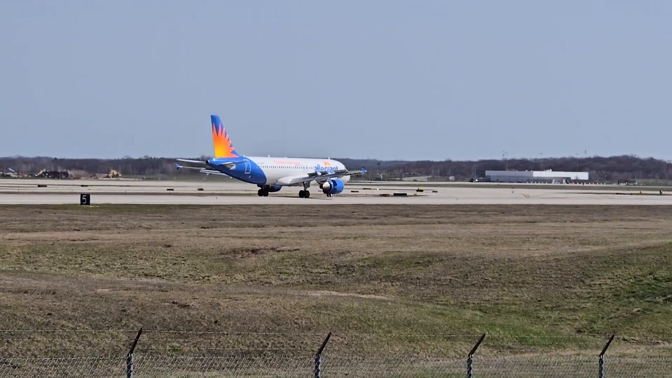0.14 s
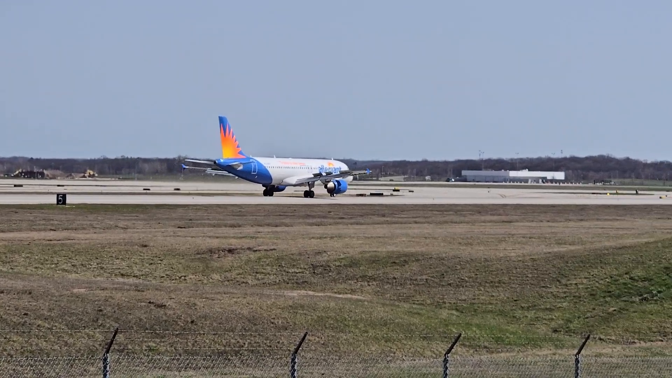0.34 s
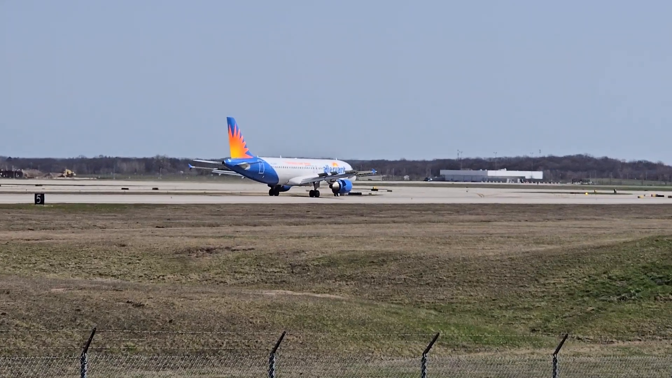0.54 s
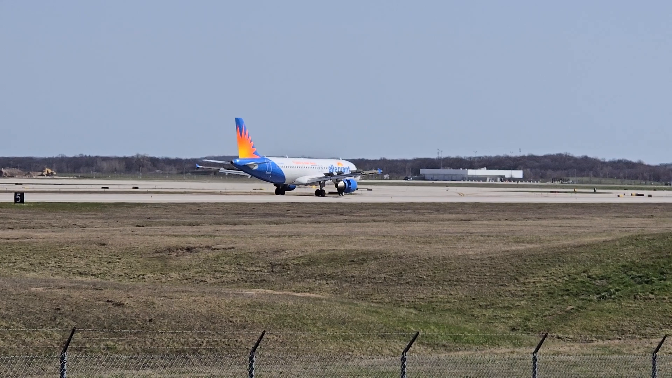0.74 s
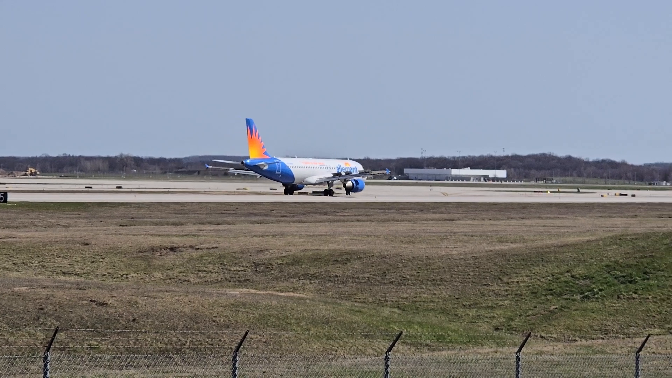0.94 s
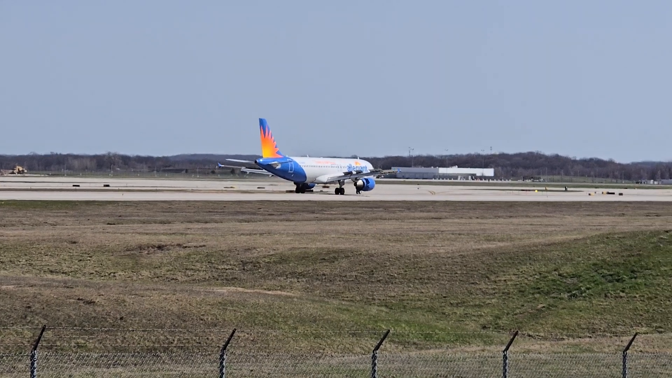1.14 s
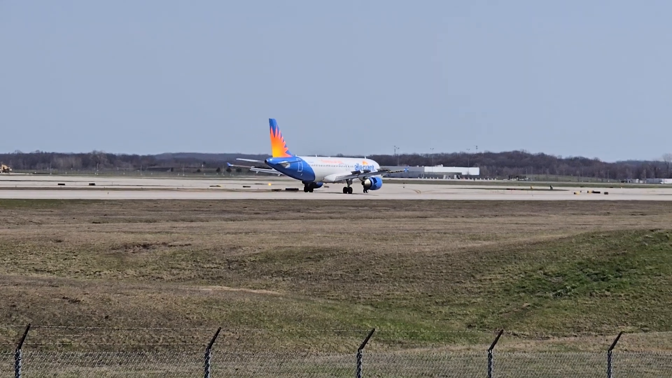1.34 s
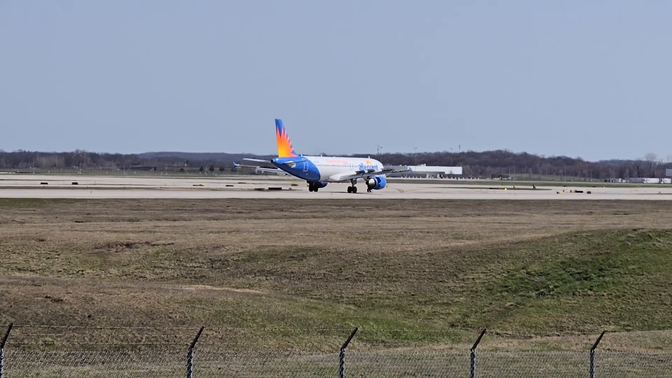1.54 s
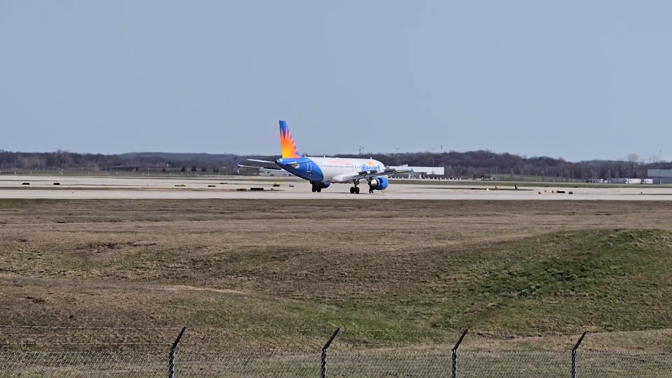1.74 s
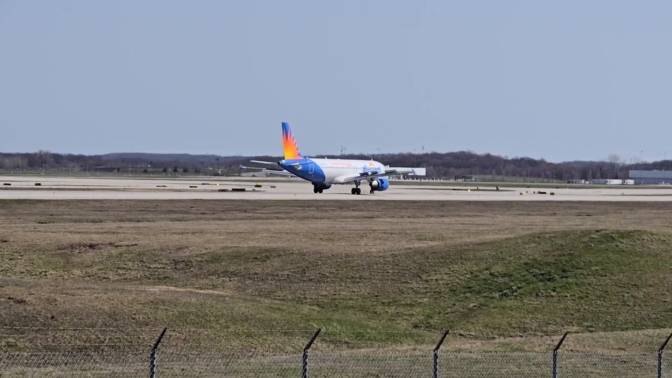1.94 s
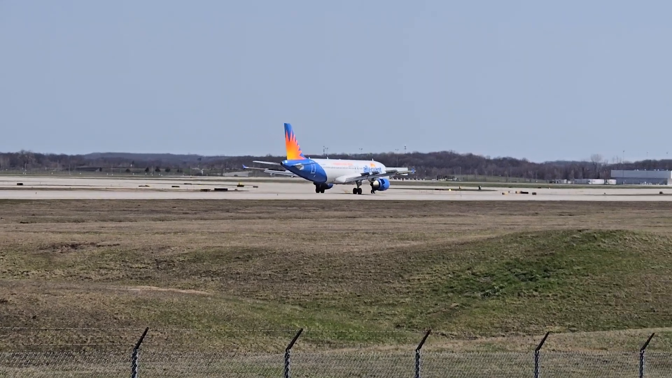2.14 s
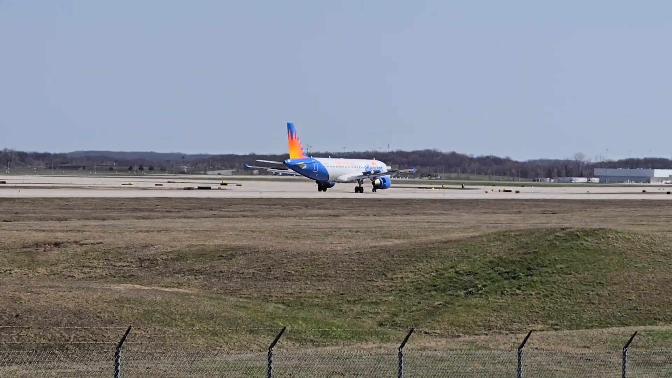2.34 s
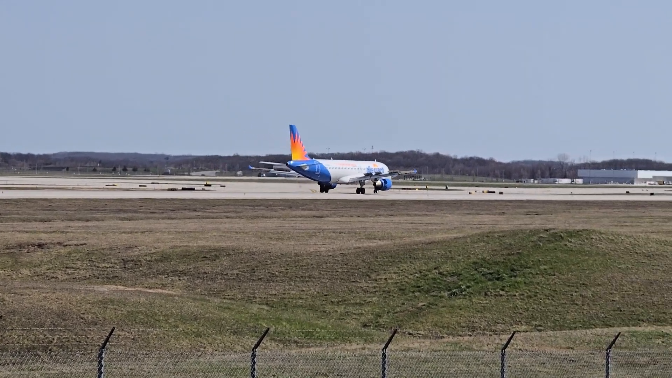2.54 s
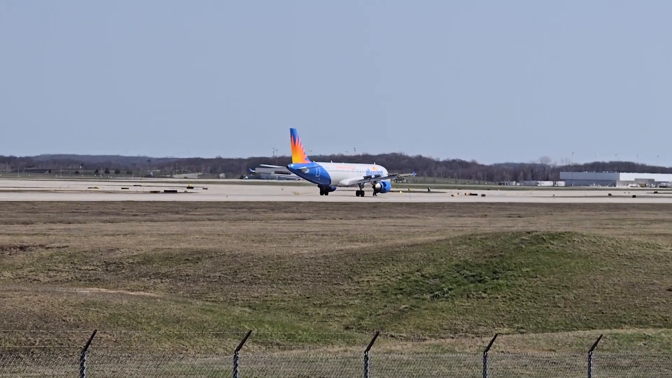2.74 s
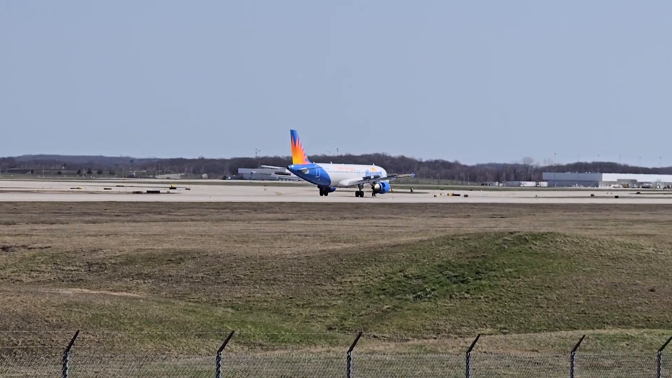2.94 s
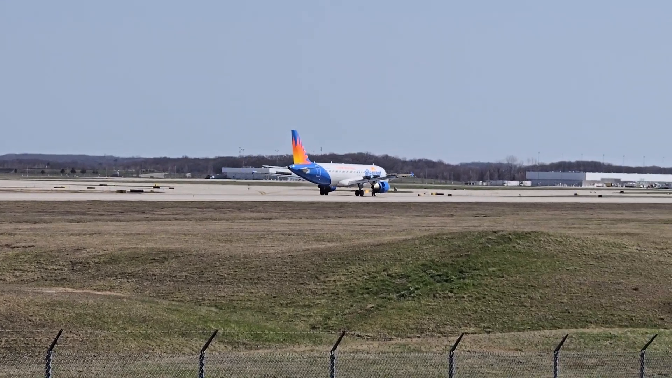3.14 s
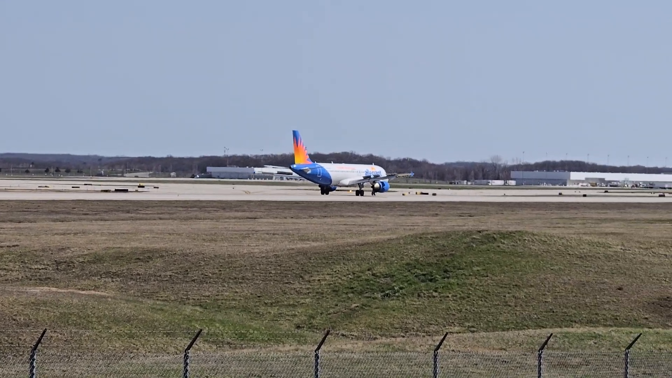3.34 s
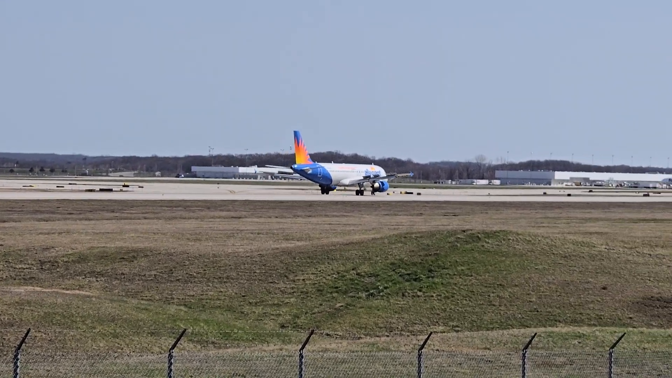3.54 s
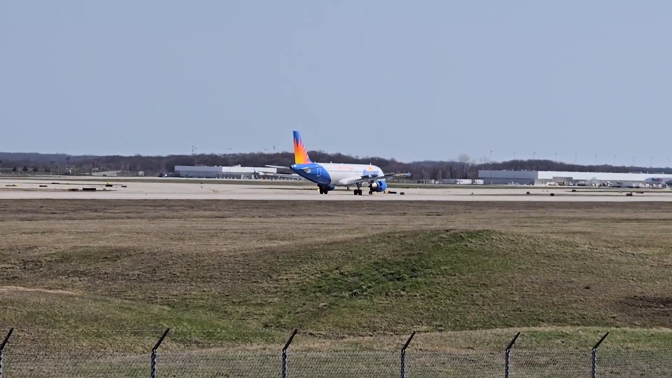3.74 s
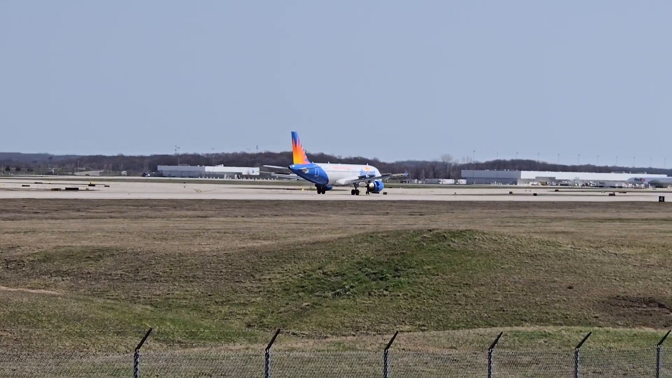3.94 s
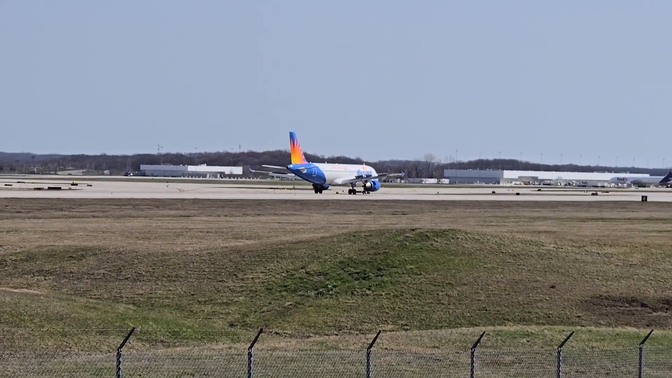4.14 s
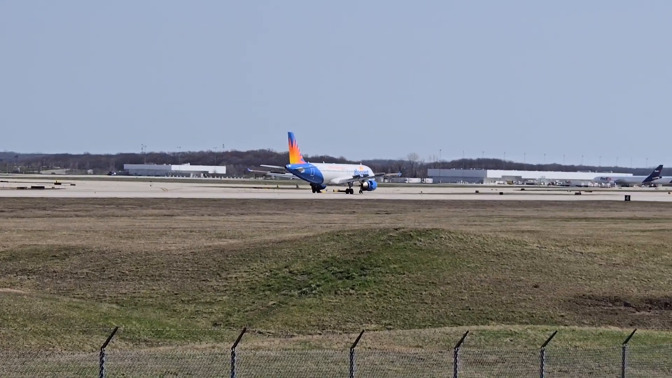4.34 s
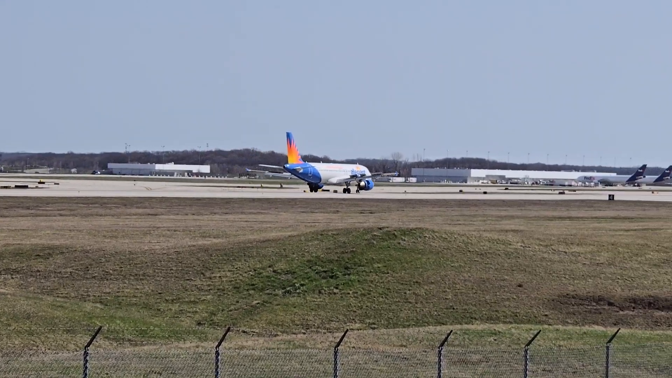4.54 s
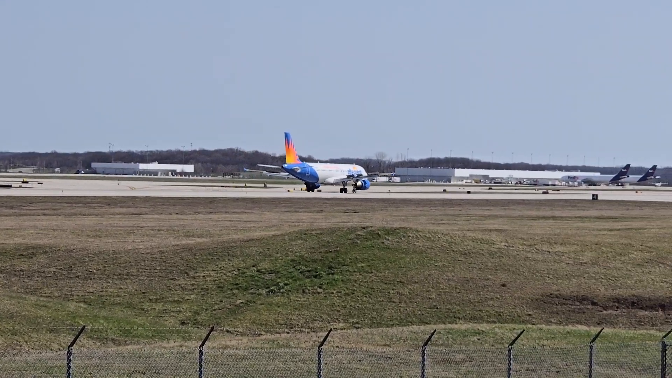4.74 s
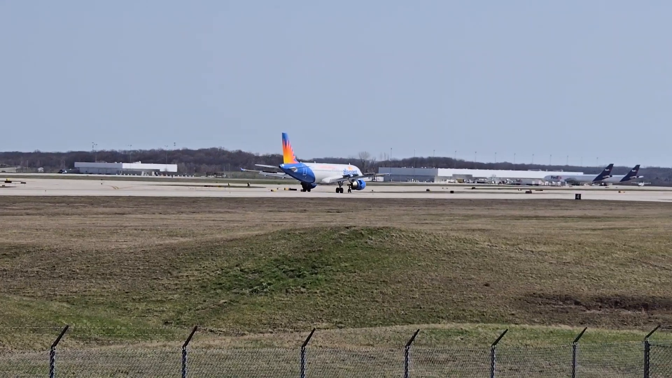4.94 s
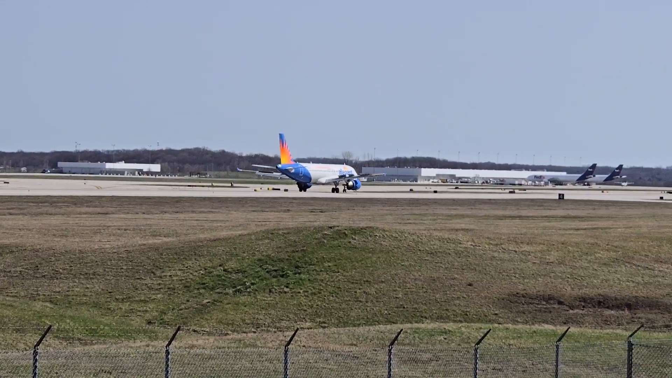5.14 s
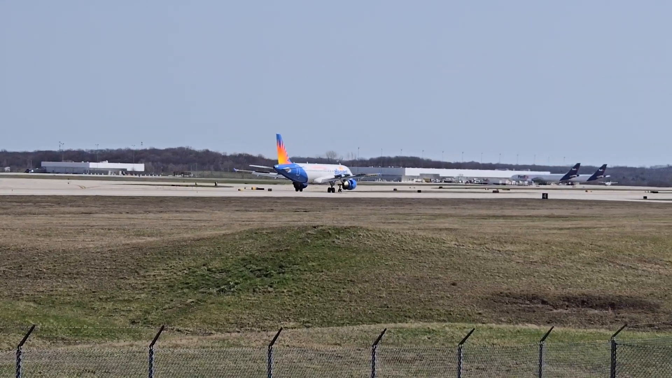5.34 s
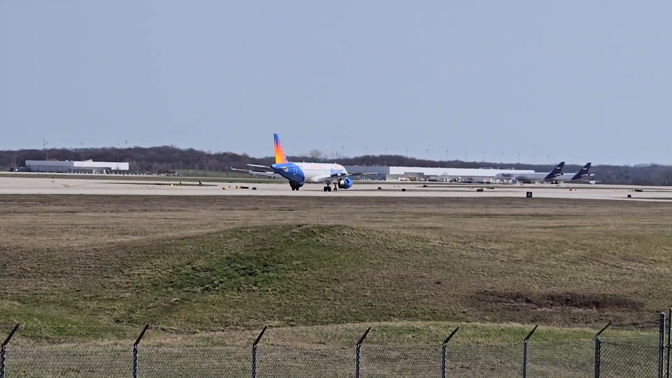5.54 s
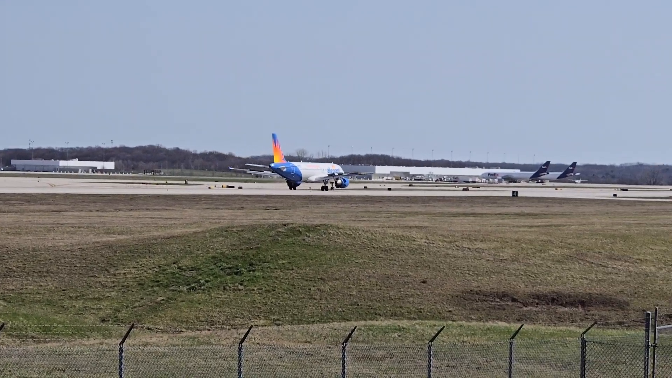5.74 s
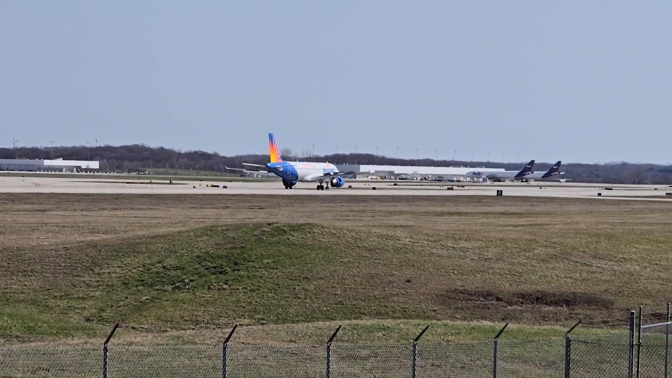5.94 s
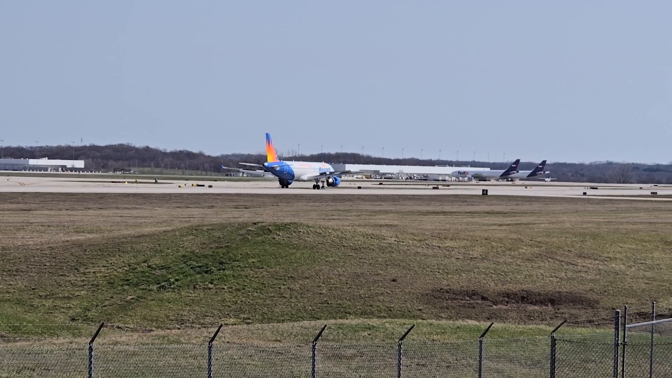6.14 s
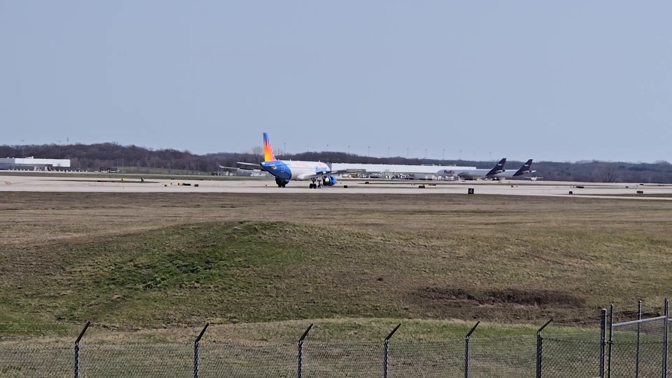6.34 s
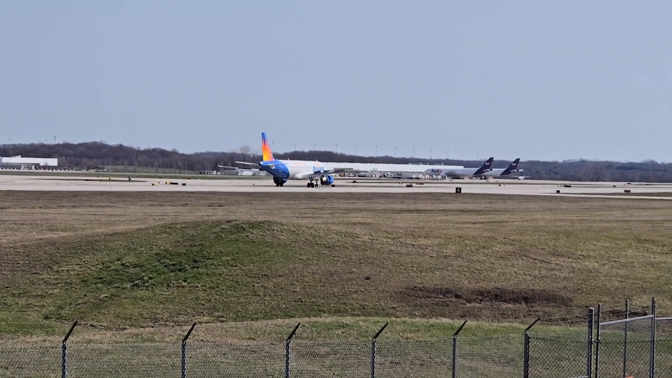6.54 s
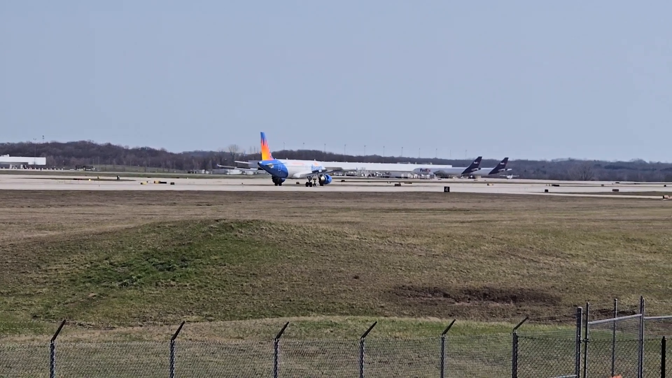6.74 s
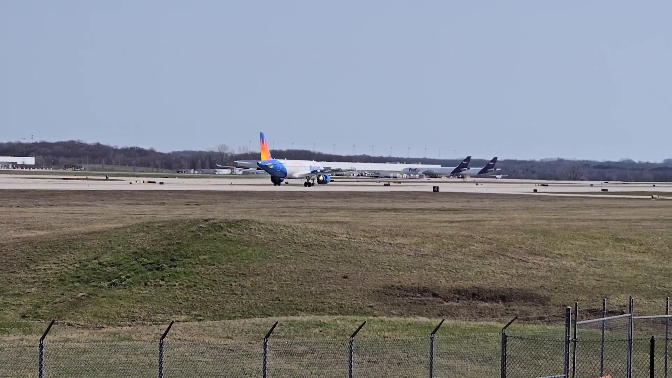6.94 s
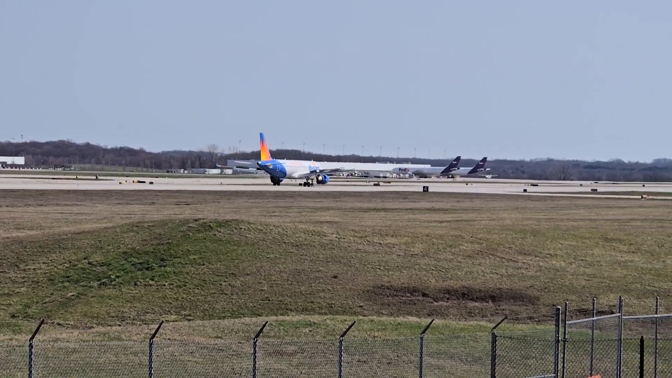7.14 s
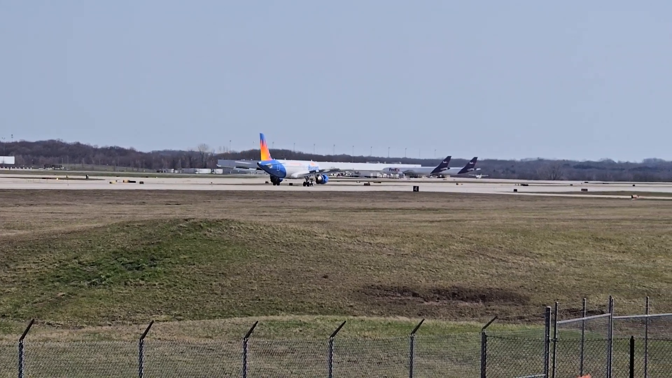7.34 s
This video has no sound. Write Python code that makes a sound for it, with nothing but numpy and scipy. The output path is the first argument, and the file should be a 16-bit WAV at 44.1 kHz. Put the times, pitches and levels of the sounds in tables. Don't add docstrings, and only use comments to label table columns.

```python
import sys
import numpy as np
from scipy import signal
from scipy.io import wavfile
from scipy.ndimage import uniform_filter1d

SR = 44100
rng = np.random.default_rng(int(sys.argv[2]) if len(sys.argv) > 2 else 0)


def unload_wav(signal):
    wavfile.write(
        sys.argv[1],
        SR,
        np.round(np.clip(np.atleast_2d(signal).T, -1, 1) * 32767).astype(np.int16),
    )


def attenuation_scalar(level_db):
    decades = np.asarray(level_db, float) / 20
    return 10 ** decades


N = 325899

FRAME, HOP = 2048, 512
HZ = np.fft.rfftfreq(FRAME, 1 / SR)
TIMES = np.arange(N // HOP + 5) * HOP / SR
AIR_LOSS_FROM_HZ, AIR_LOSS_DB = 5340, 2.6

# time in seconds, roar level in dB.
THRUST = [(0, -13.5), (.2, -15.5), (.45, -18), (.72, -17), (.9, -20), (1.25, -22.5), (1.5, -20.5),
          (1.75, -21.5), (2.2, -24.5), (2.5, -27), (3.5, -28), (4.0, -31), (4.7, -33.5), (5.3, -33),
          (5.85, -32), (6.3, -36), (6.9, -38), (7.39, -36)]
JET_BANDS = [(30, 130), (130, 450), (450, 2450), (2650, 5200)]
# level at full thrust in dB, dB per dB of thrust, share of the
JET_FOLLOW = [(-15.5, 1.06, 1.09), (-19.5, 0.9951, 0.37), (-15.5, 1.0456, 0), (-30.5, 1.062, 0)]
# frequency in Hz, density in dB per Hz.
JET_COLOUR = [(15, -38), (28, -22), (45, -4), (68, 0), (120, -4), (200, -11), (273, -16), (339, -12),
              (421, -22), (500, -17), (700, -19), (1000, -19), (1430, -15), (1900, -21)]
# time in seconds, length in seconds, rise in dB.
BOOMS = [(.07, 0.082, 7.5), (.37, 0.33, 9.5), (.65, 0.1, 10), (.85, 0.092, 3), (1.0, .1, 0.5),
         (1.55, 0.21, 1), (1.97, 0.11, -1), (2.16, 0.071, 1.5), (2.4, .2, 0.5), (2.8, 0.052, 3.5),
         (3.0, 0.21, 3.5), (3.35, 0.12, 5.5), (3.7, 0.2, 6), (3.83, 0.033, 11), (5.06, 0.17, 9),
         (6.22, .06, 9), (6.52, 0.25, 14.5), (7.02, 0.12, 9), (7.35, 0.45, 11.5)]
# time in seconds, length in seconds, change in dB.
LULLS = [(0.74, 0.04, -3), (1.135, 0.13, -0.5), (1.787, 0.18, -2), (2.06, .06, -2), (2.62, 0.12, -2),
         (3.55, 0.082, -4), (3.928, 0.093, -5.5), (4.717, 0.1, -7), (5.91, 0.069, 0.5)]
# frequency in Hz, likeness (0-1), left's lead in radians,
# left-right difference in dB.
PORTS = [(40, .84, -.35, 0), (170, .74, -.1, -.5), (320, .83, 0, 0), (500, .94, .2, 1), (750, .97, .2, 1),
         (1500, .92, .5, 1), (2400, .86, .6, .5), (2600, .2, 1.2, -2), (2800, .6, 2.9, 2),
         (3050, .4, 1.7, 4), (3600, .5, 2, 3.5), (4200, .6, 1.6, 0), (5000, .6, 2.8, -2.5),
         (6000, .32, 2.9, 9)]
# frequency in Hz, gain in dB.
HOUSING = [(1900, -0.5), (2250, -1), (2720, -17.5), (2950, -11.5), (3200, -15.5), (3800, -14.5),
           (4400, -15), (4900, -14), (5300, -28), (6200, -38.5), (7600, -45.5), (8500, -66.5), (9200, -100)]
# frequency in Hz, density in dB per Hz.
FIELD = [(15, -34), (40, -14.5), (170, -0.5), (300, -9), (450, -1.5), (750, 0), (1000, -11), (1400, -16),
         (1900, -22.5)]
# frequency in Hz, density in dB per Hz.
SELF_NOISE = [(4000, -20), (6500, -11), (7500, -3), (8900, -9), (10000, -5), (10900, -11), (11800, 0),
              (12500, -3), (13300, -3), (14500, -6), (15500, -10), (16200, -25)]
# time in seconds, level in dB.
SELF_NOISE_DB = [(0, -93), (2.5, -86), (3.6, -82), (7.39, -77.5)]
# time in seconds, level in dB.
WIND = [(0, -55), (2.6, -49.5), (3.2, -41.5), (4.0, -34), (4.5, -33), (5.4, -35), (6.2, -26.5), (6.7, -31),
        (7.0, -29.5), (7.39, -28.5)]
# frequency in Hz, density in dB per Hz.
WIND_COLOUR = [(18, -12), (35, -2.5), (85, -9.5), (170, 3), (300, -8), (520, -16.5), (1500, -61),
               (4000, -110)]
FOLDS = [(3.57, .04), (3.76, .06), (4.03, .06), (5.88, .04), (6.57, .05), (7.185, .09)]
# start in seconds, length in seconds, from
# Hz, to Hz, level in dB.
CHIPS = [
    (3.56, 0.045, 8570, 8140, -84),
    (3.775, 0.046, 8250, 7650, -79),
    (4.12, .035, 8280, 7870, -79),
    (4.738, 0.042, 8900, 7600, -77.5),
    (5.268, .047, 8270, 7750, -75),
    (6.22, .1, 10600, 8900, -86),
    (6.44, .06, 12200, 11100, -81),
    (6.49, .04, 15200, 14100, -85),
]
# time in seconds, length in seconds, centre in Hz, width in Hz,
# level in dB.
RUSTLES = [(3.8, .2, 10200, 900, -92), (5.83, .08, 7300, 2500, -84), (6.203, .25, 10100, 1200, -83),
           (6.303, .04, 11000, 8000, -86), (6.5, .06, 12500, 6000, -85), (7.28, .15, 8500, 6000, -82)]
# time in seconds, length in seconds, rise in dB.
FAN_SWELLS = [(4.52, .08, 16), (4.87, .07, 12), (5.25, 0.1, 7), (5.56, 0.074, 9), (5.96, 0.15, 9.5),
              (6.62, 0.051, 7.5), (6.82, .12, 5), (7.02, .06, -2)]
# start in seconds, length in seconds, from Hz, to Hz, level in dB.
DROPS = [
    (5.274, 0.057, 5260, 4920, -61),
    (5.88, .04, 5340, 5200, -69.5),
    (5.967, 0.034, 5100, 4820, -55),
    (6.036, 0.079, 4540, 4330, -56.5),
    (6.24, 0.048, 3570, 3585, -60),
    (6.275, .075, 4900, 4260, -67),
    (6.47, .04, 4900, 4480, -59),
]
# start in seconds, length in seconds, from Hz, to Hz,
# level in dB.
HOOKS = [
    (5.442, .145, 4190, 4065, -61.5),
    (5.66, 0.1, 4760, 3800, -60),
    (6.118, 0.11, 4000, 3490, -57),
    (6.333, .135, 3350, 3250, -57.5),
    (6.467, .15, 4000, 3330, -53),
    (6.68, 0.11, 3780, 3345, -68),
]
# pitch in Hz, left's lead in radians,
# left-right difference in dB.
LARK_SIDE = [(3300, 2.5, 3), (3700, 2., 2.5), (4100, 1., 1), (4600, 1., 0), (5200, .7, -1)]
# time in seconds, level in dB.
TICKS = [
    (6.293, -63),
    (7.226, -54),
    (7.277, -50),
]


def evened(x):
    return x / np.sqrt(np.mean(x ** 2) + 1e-20)


def read(points, column=1):
    table = np.array(points, float)
    return np.interp(np.log(HZ + 1), np.log(table[:, 0] + 1), table[:, column])


def whole(colour_db):
    return colour_db - 10 * np.log10(np.sum(attenuation_scalar(colour_db) ** 2))


def bumps(events, t):
    return sum(db * np.exp(-(2 * (t - s) / length) ** 2) for s, length, db in events)


def patches(bins, frames):
    field = rng.standard_normal((len(TIMES), len(HZ))).T
    return evened(uniform_filter1d(uniform_filter1d(field, bins, 0), frames, 1))


def noise(power_db, same=0., lead=0., balance_db=0.):
    a, b, c, d = rng.standard_normal((len(TIMES), len(HZ), 4)).T
    same, lead, balance_db = (np.reshape(v, (-1, 1)) for v in (np.clip(same, 0, 1), lead, balance_db))
    left = a + 1j * b
    right = same * left * np.exp(-1j * lead) + np.sqrt(1 - same ** 2) * (c + 1j * d)
    z = np.array([left * attenuation_scalar(balance_db / 2), right / attenuation_scalar(balance_db / 2)]) * attenuation_scalar(power_db)
    unit = np.sqrt(3 / 8)
    return unit * signal.istft(z, nperseg=FRAME, noverlap=FRAME - HOP)[1][:, :N]


def tone(rows, lead, balance_db, overtones_db=(), waver_hz=0., flutter_db=0., fade=0.17):
    s, hz, db = np.transpose(rows)
    t = np.arange(s[0], s[-1], 1 / SR)
    waver = waver_hz * evened(uniform_filter1d(rng.standard_normal(len(t)), 900))
    slow = uniform_filter1d(uniform_filter1d(rng.standard_normal(len(t)), 700), 700)
    flutter = flutter_db * evened(slow)
    turn = 2 * np.pi * np.cumsum(np.interp(t, s, hz) + waver) / SR - np.array([[0], [lead]])
    wave = sum(attenuation_scalar(part) * np.sin((k + 1) * turn) for k, part in enumerate((0, *overtones_db)))
    sides = attenuation_scalar(np.array([[balance_db], [-balance_db]]) / 2)
    level = attenuation_scalar(np.interp(t, s, db) + flutter) * signal.windows.tukey(len(t), fade)
    out, start = np.zeros((2, N)), round(s[0] * SR)
    out[:, start:start + len(t)] = np.sqrt(2) * wave * sides * level
    return out


def slur(start, length, from_hz, to_hz, db, bend, peak, start_db, end_db):
    u = np.linspace(0, 1, num=12)
    rise = start_db * (1 - u / peak) ** 2
    fall = end_db * ((u - peak) / (1 - peak)) ** 2
    hz = to_hz + (from_hz - to_hz) * (1 - u) ** bend
    return np.c_[start + u * length, hz, db + np.where(u < peak, rise, fall)]


def jet():
    full_db = -15
    thrust = np.interp(TIMES, *np.transpose(THRUST)) - full_db
    booms = bumps(BOOMS + LULLS, TIMES)
    levels = [full + follow * thrust + share * booms for full, follow, share in JET_FOLLOW]
    colour = read(JET_COLOUR) + read(HOUSING)
    held = [10 * np.log10(np.sum(attenuation_scalar(colour[(HZ > lo) & (HZ <= hi)]) ** 2)) for lo, hi in JET_BANDS]
    lift = np.array([db - h for db, h in zip(levels, held)])
    centres = np.sqrt(np.prod(JET_BANDS, 1))
    blend = np.array([read(np.c_[centres, row]) for row in np.eye(len(centres))]).T
    loss = AIR_LOSS_DB * np.outer(np.maximum(HZ - AIR_LOSS_FROM_HZ, 0) / 1000, TIMES)
    loss += 0.0151 * np.outer(np.minimum(HZ / 1000, 9) ** 2, TIMES)
    boil = read([(60, 1.6), (400, 3.0), (2000, 1.4), (5000, 2.1)])[:, None] * patches(5, 9)
    gusts = 0.41 * patches(240, 3)
    power_db = colour[:, None] + blend @ lift - loss + boil + gusts
    return noise(power_db, read(PORTS, column=1), read(PORTS, column=2), read(PORTS, column=3))


def airfield():
    level_db = -36
    lumps = read([(60, 3.9), (500, 1.5), (3000, 1.4)])[:, None] * patches(5, 8)
    slope = -5. * np.log2(np.maximum(HZ / 1900, 1))
    slope -= 6. * np.maximum(HZ - AIR_LOSS_FROM_HZ, 0) / 1000
    colour = whole(read(FIELD)) + read(HOUSING) + slope
    return noise(colour[:, None] + level_db + lumps, same=.25)


def self_noise():
    level = np.interp(TIMES, *np.transpose(SELF_NOISE_DB))
    return noise(whole(read(SELF_NOISE))[:, None] + level + 1.2 * patches(30, 8))


def wind():
    lull_db = -9.5
    lulls = bumps([(s, 2 * length, lull_db) for s, length in FOLDS], TIMES)
    level = np.interp(TIMES, *np.transpose(WIND)) + lulls
    flicker = 1.8 * patches(60, 3) + 1.3 * patches(5, 6)
    return noise(whole(read(WIND_COLOUR))[:, None] + level + flicker)


def chips():
    notes = [slur(*chip, bend=1.8, peak=.4, start_db=-13, end_db=-12.5) for chip in CHIPS]
    return sum(tone(note, lead=-1., balance_db=-4, waver_hz=12) for note in notes)


def rustles():
    power = 0
    for s, length, hz, width_hz, db in RUSTLES:
        colour = whole(-20 * np.minimum(((HZ - hz) / width_hz) ** 2, 5))
        puff = db - 20 * np.minimum(((TIMES - s) / length) ** 2, 5)
        power = power + attenuation_scalar(colour[:, None] + puff) ** 2
    return noise(10 * np.log10(power))


def whine():
    from_hz, idle_hz, spool_s = 828, 746, 1.1
    faint_db, clear_db, clears_s = -58, -49, 5.5
    t = np.linspace(4.3, 7.12, num=150)
    hz = idle_hz + (from_hz - idle_hz) * np.exp(-(t - t[0]) / spool_s)
    clear = .5 + .5 * np.tanh((t - clears_s) / .06)
    db = faint_db + (clear_db - faint_db) * clear + bumps(FAN_SWELLS, t)
    return tone(np.c_[t, hz, db], lead=.1, balance_db=1, waver_hz=9, flutter_db=3.5, fade=.05)


def lark():
    notes = [slur(*note, bend=1.2, peak=.55, start_db=-8.5, end_db=-10) for note in DROPS]
    notes += [slur(*note, bend=2, peak=.5, start_db=-10.5, end_db=-4) for note in HOOKS]
    side_hz, leads, balances = np.transpose(LARK_SIDE)
    song = np.zeros((2, N))
    for note in notes:
        pitch = note[:, 1].mean()
        lead, balance_db = np.interp(pitch, side_hz, leads), np.interp(pitch, side_hz, balances)
        song += tone(note, lead, balance_db, overtones_db=(-46, -48), waver_hz=12, flutter_db=2.5, fade=.15)
    return attenuation_scalar(1.5) * song


def ground_smear(song):
    decay_s, wet_db = 0.31, -12.5
    t = np.arange(SR // 5) / SR
    smear = rng.standard_normal((2, len(t))) * attenuation_scalar(-60 * t / decay_s)
    smear /= np.linalg.norm(smear[0])
    return song + attenuation_scalar(wet_db) * signal.fftconvolve(song, smear, axes=1)[:, :N]


def ticks():
    out, t = np.zeros((2, N)), np.arange(500) / SR
    for s, db in TICKS:
        out[:, round(s * SR):][:, :len(t)] += attenuation_scalar(db - 60 * t / 0.017) * rng.standard_normal((2, len(t)))
    return signal.sosfilt(signal.butter(4, [1500, 5500], "band", fs=SR, output="sos"), out)


def scene():
    birds = ground_smear(chips() + lark())
    return jet() + airfield() + wind() + birds + rustles() + whine() + ticks()


def roll_off(x):
    return signal.sosfilt(signal.butter(12, 15720, fs=SR, output="sos"), x)


def record(dry):
    heard = signal.sosfilt(signal.butter(2, 24, "high", fs=SR, output="sos"), dry) + self_noise()
    t = np.arange(N) / SR
    fold = sum(np.clip(2 - 4 * abs(t - s) / length, 0, 1) for s, length in FOLDS)
    side = (heard[0] - heard[1]) / 2
    low_side = signal.sosfiltfilt(signal.butter(2, 800, fs=SR, output="sos"), side)
    folded = heard - np.array([[1], [-1]]) * fold * low_side
    return roll_off(folded)


dry = scene()
out = record(dry)
unload_wav(out)
```